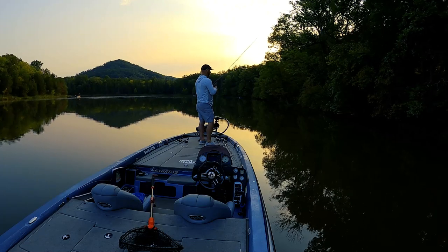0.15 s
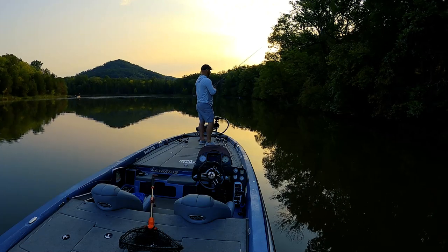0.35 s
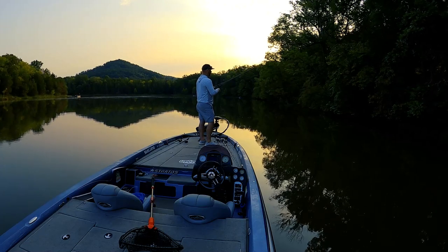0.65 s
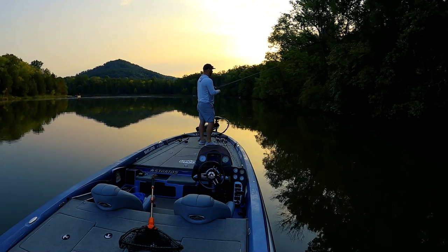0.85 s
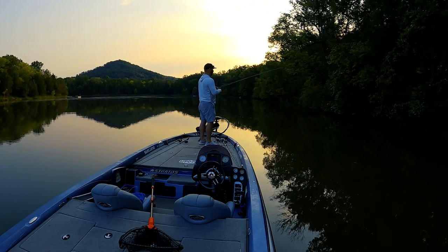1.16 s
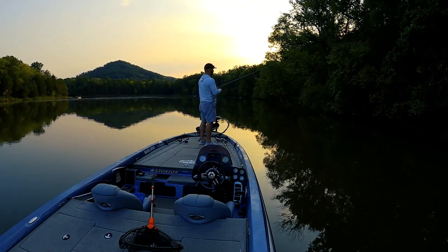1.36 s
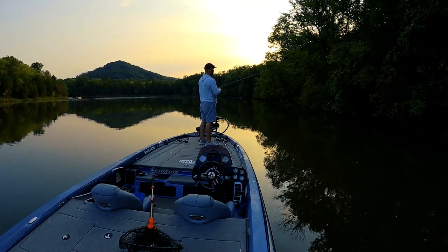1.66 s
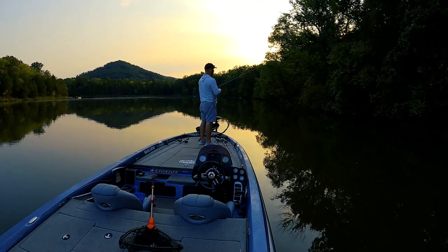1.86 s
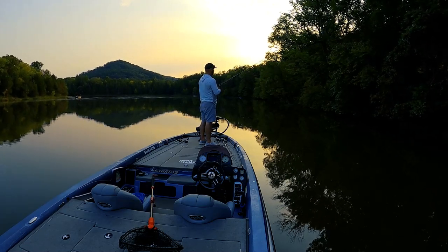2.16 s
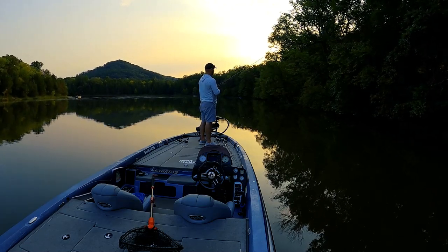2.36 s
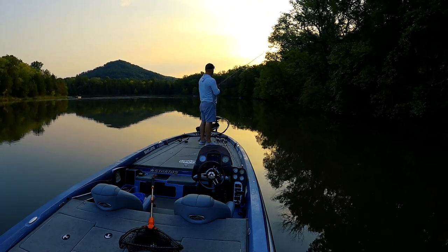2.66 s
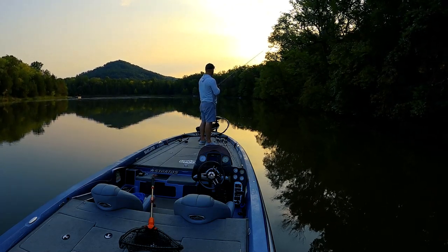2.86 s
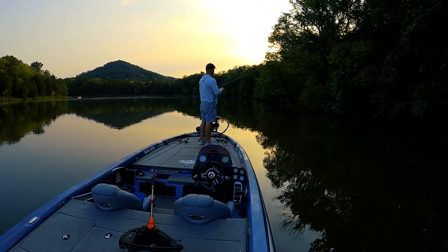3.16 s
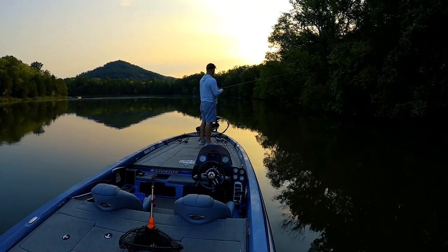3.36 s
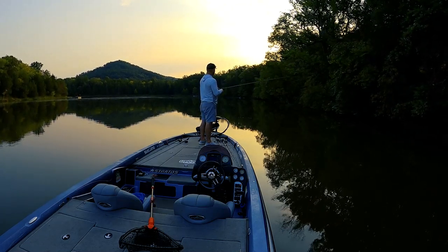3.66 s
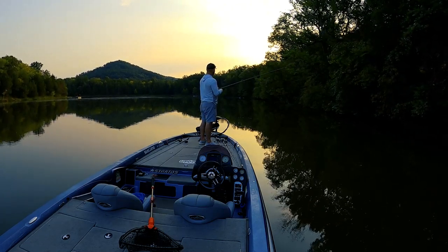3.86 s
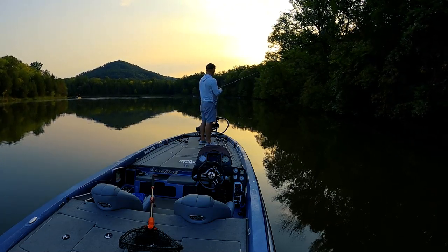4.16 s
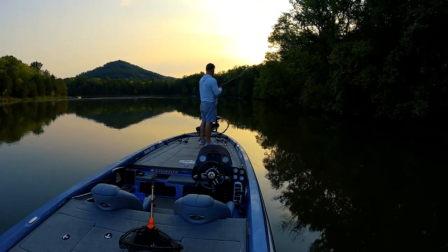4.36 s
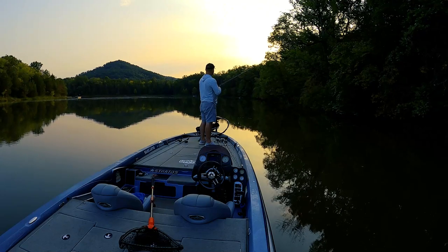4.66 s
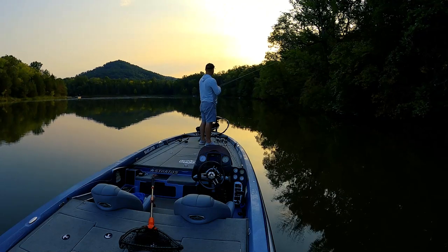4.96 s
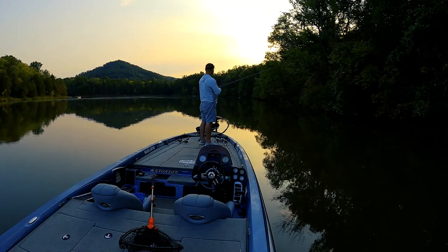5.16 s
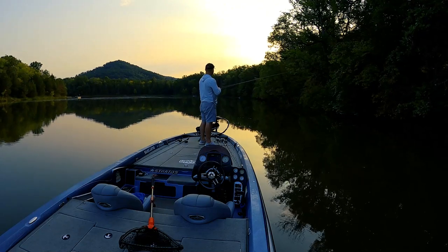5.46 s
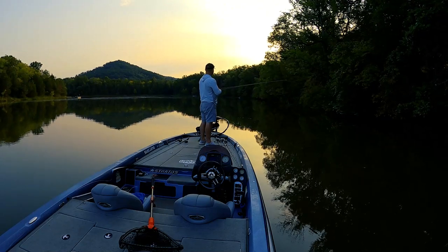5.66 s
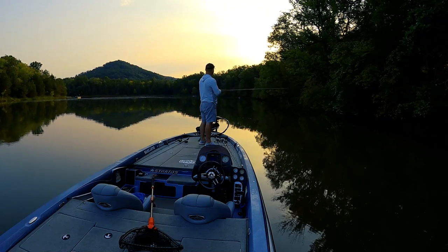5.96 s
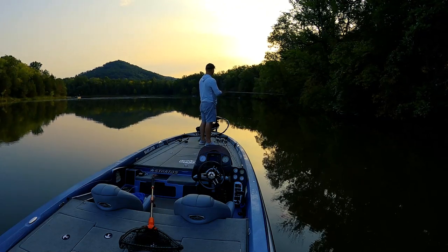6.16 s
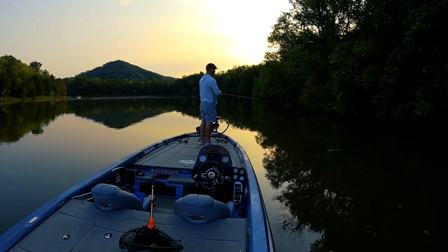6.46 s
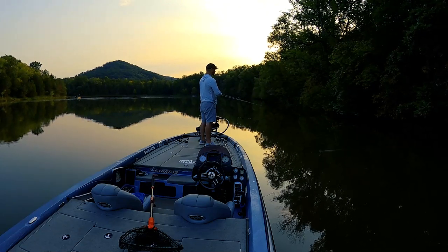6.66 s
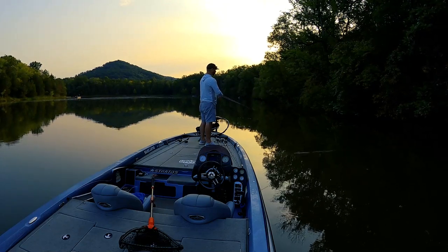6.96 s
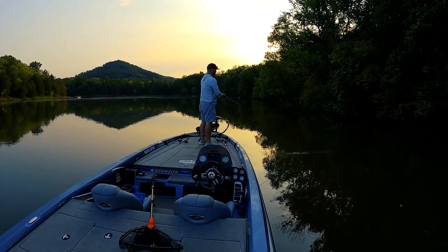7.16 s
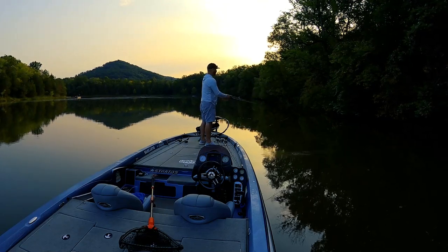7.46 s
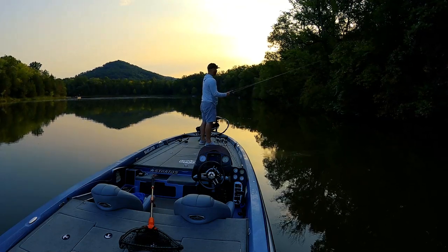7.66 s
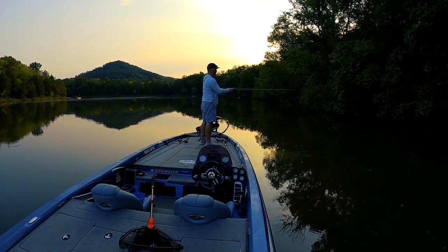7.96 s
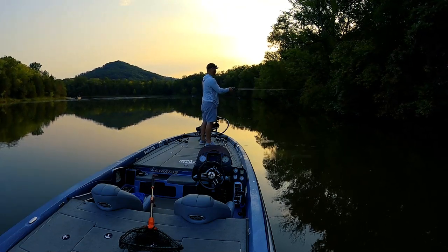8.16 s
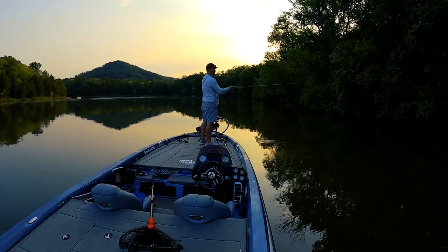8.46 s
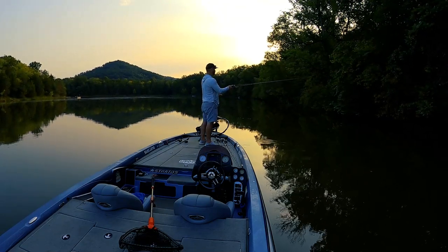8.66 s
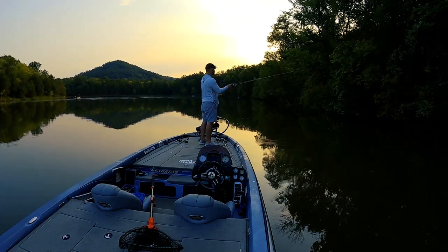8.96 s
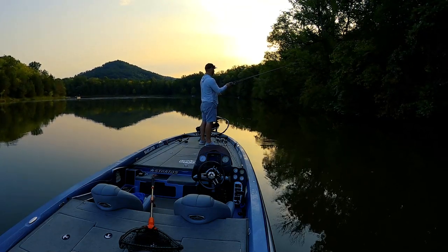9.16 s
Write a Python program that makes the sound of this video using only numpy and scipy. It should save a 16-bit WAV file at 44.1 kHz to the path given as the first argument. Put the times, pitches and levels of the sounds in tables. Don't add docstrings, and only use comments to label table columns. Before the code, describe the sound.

Dense steady insect drone over a still dusk lake, a close katydid buzzing in pulses, birds whistling, faint engine throb, then a fishing cast swishing.

```python
import sys
import numpy as np
from scipy import signal
from scipy.fft import rfft, irfft, next_fast_len
from scipy.io import wavfile
from scipy.ndimage import uniform_filter1d

SR = 44100
rng = np.random.default_rng(int(sys.argv[2]) if len(sys.argv) > 2 else 0)


def master_out(mix):
    frames = np.transpose(np.atleast_2d(mix))
    ceiling = np.clip(frames, -1, 1)
    pcm = np.round(ceiling * 32767).astype(np.int16)
    wavfile.write(sys.argv[1], SR, pcm)


def volts_from_db(level):
    exponent = np.asarray(level, float) / 20
    return 10 ** exponent


N = 410571

BANK_LAG, BOW_LAG = 3.34, 2.293
OPPOSITE = np.array([[1], [-1]])


def rms_one(x):
    return x / np.sqrt(np.mean(x ** 2) + 1e-20)


def in_time(rows):
    s, *columns = np.transpose(rows)
    return [np.interp(np.arange(N) / SR, s, c) for c in columns]


def in_span(rows, fade_s):
    s, *columns = np.transpose(rows)
    span = slice(int(s[0] * SR), min(int(s[-1] * SR), N))
    now = np.arange(span.start, span.stop) / SR
    fade = np.clip(np.minimum(now - s[0], s[-1] - now) / fade_s, 0, 1)
    return span, fade, [np.interp(now, s, c) for c in columns]


def drift(rate_hz):
    r = np.exp(-80 * np.pi * rate_hz / SR)
    white = rng.standard_normal(N // 40 + 2002)
    slow = signal.lfilter([1], [1, -2 * r, r * r], white)[2000:]
    return np.interp(np.arange(N) / 40, np.arange(len(slow)), rms_one(slow))


def hump(middle_s, length_s):
    out = np.zeros(N)
    start = max(int((middle_s - length_s / 2) * SR) + 1, 0)
    at = np.arange(start, min(int((middle_s + length_s / 2) * SR), N))
    out[at] = np.cos(np.pi * (at / SR - middle_s) / length_s)
    return out


def band(x, low_hz, high_hz):
    return signal.sosfilt(signal.butter(2, [low_hz, high_hz], "band", fs=SR, output="sos"), x)


def ring(clicks, hz, t60):
    r, w = volts_from_db(-60 / (t60 * SR)), 2 * np.pi * hz / SR
    return signal.lfilter([0, np.sin(w)], [1, -2 * r * np.cos(w), r * r], clicks + 1e-18)


def colour(x, points):
    size = next_fast_len(N)
    hz = np.maximum(np.fft.rfftfreq(size, 1 / SR), 1)
    point_hz, point_db = np.transpose(points)
    shape_db = np.interp(np.log(hz), np.log(point_hz), point_db, left=-90, right=-90)
    return irfft(rfft(x, size) * volts_from_db(shape_db) * np.sqrt(SR / 2), size)[..., :N]


def pan(x, left_right_db, lag=BANK_LAG):
    late = np.interp(np.arange(N) - lag, np.arange(N), x)
    return np.array([late * volts_from_db(left_right_db / 2), x * volts_from_db(-left_right_db / 2)])


def surround(sources, points):
    size, points = next_fast_len(N), np.array(points)
    hz = np.maximum(np.fft.rfftfreq(size, 1 / SR), 1)
    left_db, right_db, alike = (np.interp(np.log(hz), np.log(points[:, 0]), c) for c in points.T[1:])
    alike = np.clip(alike, 0, 1)
    common, own_left, own_right = rfft(sources, size)
    late = np.exp(-2j * np.pi * hz * BANK_LAG / SR)
    left = volts_from_db(left_db) * (np.sqrt(alike) * common * late + np.sqrt(1 - alike) * own_left)
    right = volts_from_db(right_db) * (np.sqrt(alike) * common + np.sqrt(1 - alike) * own_right)
    return irfft(np.array([left, right]) * np.sqrt(SR / 2), size)[:, :N]


def chorus():
    # pitch_hz, left_db_per_hz, right_db_per_hz, likeness_0_to_1
    insect_spectrum = [(3600, -130, -132, 0.2), (4050, -108, -111, 0.03), (4380, -97.5, -94.5, 0.43),
                       (4903, -86, -88.5, 0.08), (5120, -86.5, -86, 0.1), (5180, -82, -82.5, .1),
                       (5170, -85, -86, .15), (5655, -85.5, -86.5, 0.41), (6010, -88, -99, 0.53),
                       (6530, -92, -98, 0.26), (6968, -99, -106, 0.57), (7597, -107, -114, 0.7),
                       (8380, -121, -123, 0.13), (8700, -125, -128, 0.3), (9000, -175, -175, .3)]
    # time_s, level_db
    wood_swell = [(0, 0), (2.5, 1), (5, 1), (7, 1.1), (9.31, 1)]
    strokes = rng.standard_normal((3, N)) * (rng.random((3, N)) < .4)
    throb = np.array([volts_from_db(.5 * drift(15.0) + 0.34 * drift(22.0)) for _ in strokes])
    swell_db, = in_time(wood_swell)
    return volts_from_db(swell_db) * surround(rms_one(strokes * throb), insect_spectrum)


def katydid():
    # middle_s, level_db
    buzzes = [(.46, -85), (.76, -81), (1, -83), (1.27, -82.5), (1.53, -78), (1.8, -79), (2.07, -82),
              (2.36, -77.5), (2.64, -76), (2.94, -77.5), (3.21, -78.5), (3.48, -80), (3.779, -78.5),
              (4.07, -78.5), (4.33, -79), (4.61, -78), (4.89, -76.5), (5.17, -74), (5.46, -73), (5.72, -79),
              (5.98, -77.5), (6.31, -78), (6.57, -76.5), (6.92, -75.5), (7.19, -74.5), (7.45, -79.5),
              (8.21, -72), (8.6, -80.5), (9.03, -83.5)]
    buzz_s, wing_low_hz, wing_high_hz = 0.12, 7680, 7930
    swell = sum(volts_from_db(db - 3.0) * hump(s, buzz_s) for s, db in buzzes)
    teeth = rng.standard_normal(N) * (rng.random(N) < .1)
    wing = band(band(teeth, wing_low_hz, wing_high_hz), wing_low_hz, wing_high_hz)
    return pan(swell * rms_one(wing), 16.7)


def jay():
    # start_s, length_s, level_db, second_partial_db, its_change_in_first_syllable_db
    cries = [
        (0.967, 0.21, -60.5, -12.5, 1.5),
        (1.341, 0.2, -62, -10.5, -1.5),
        (3.598, 0.22, -68, -7, -9),
        (4.001, 0.2, -66.5, -12.5, -18),
        (7.205, 0.2, -72, 0, 0),
        (7.591, 0.2, -70.5, -2, -2),
    ]
    # share_of_cry, fourth_partial_hz, level_db, third_partial_db
    cry_course = [(0, 3230, -11, -24.5), (.1, 3255, -1.5, -28), (.24, 3250, -5.5, -19),
                  (.31, 3240, -18, -14), (.39, 3250, -16, -14), (.47, 3270, -4.5, -17),
                  (.68, 3220, -3.5, -8.5), (.9, 3140, -3.5, -6), (1, 3100, -11, -7)]
    flat_by_hz = [0, 0, 10, 35, 20, 20]
    nasal_by_db = [-8, 3, -4, 0, -2, -1]
    out, hoarse, waver = np.zeros(N), volts_from_db(2.8 * drift(32.0)), drift(43.5)
    for cry, flat_hz, nasal_db in zip(cries, flat_by_hz, nasal_by_db):
        s, length_s, cry_db, second_db, opening_db = cry
        rows = [(s + share * length_s, *rest) for share, *rest in cry_course]
        span, fade, (hz, level_db, third_db) = in_span(rows, 0.0022)
        phase = 2 * np.pi * np.cumsum(.25 * (hz - flat_hz) + 5.87 * waver[span]) / SR
        first_syllable = np.linspace(4, -6, len(hz)).clip(0, 1)
        voice = np.sin(4 * phase)
        voice += volts_from_db(second_db - .2 * level_db + opening_db * first_syllable) * np.sin(2 * phase)
        voice += volts_from_db(third_db + nasal_db + .6 * (second_db + 7)) * np.sin(3 * phase)
        voice += volts_from_db(-22) * np.sin(5 * phase)
        out[span] += fade * volts_from_db(cry_db + level_db + 1.0) * hoarse[span] * voice
    return out


def songbirds():
    # start_s, length_s, from_hz, to_hz, level_db
    slurs = [(0.66, 0.03, 4330, 4270, -70), (0.97, 0.037, 2800, 3050, -76), (.345, .035, 2850, 3450, -77),
             (.265, .055, 3150, 2850, -79), (1.147, 0.034, 3080, 2830, -71), (1.12, 0.037, 3190, 3120, -65),
             (7.39, 0.034, 3150, 3200, -71), (7.39, .03, 2900, 3400, -74), (8.99, 0.04, 3330, 3620, -73),
             (9.035, 0.014, 2943, 2500, -72), (9.093, 0.086, 1950, 3200, -76),
             (8.5, 0.0394, 3100, 3324, -78), (9.205, .03, 3150, 2750, -71), (5.405, .06, 3180, 3120, -77),
             (7.8, .07, 3230, 3200, -76)]
    # start_s, length_s, from_hz, to_hz, level_db
    right_slurs = [
        (.13, 0.019, 2770, 3230, -81.5),
        (0.151, 0.033, 3230, 3280, -74.5),
        (0.229, .11, 3370, 2730, -73.5),
        (0.338, 0.046, 2700, 2000, -77.5),
    ]
    # start_s, length_s, edge_hz, turn_hz, level_db
    arches = [
        (0.548, 0.097, 1900, 1480, -78.5),
        (0.929, 0.0502, 3300, 3740, -64),
        (.61, 0.0746, 510, 550, -72.5),
    ]
    # start_s, level_db
    falls = [
        (1.146, -75),
        (6.925, -77),
        (7.345, -69),
        (7.748, -64),
    ]
    # start_s, length_s, level_db
    hooks = [(0.434, 0.1, -76), (0.847, 0.09, -74), (1.259, 0.106, -75.5), (7.045, 0.065, -68.5),
             (7.452, 0.13, -70.5), (7.868, 0.1, -66)]
    # start_s, length_s, level_db
    rises = [
        (0.604, 0.068, -77),
        (1.017, .07, -64.5),
        (7.216, 0.056, -66.5),
        (7.618, .06, -65),
        (8.032, 0.062, -69),
    ]
    # start_s, chip_count, pitch_hz, level_db
    trills = [(.163, 4, 3750, -73), (.335, 1, 4000, -75), (.74, 1, 4300, -72), (.497, 4, 3700, -75),
              (.955, 1, 1400, -74), (1.525, 1, 2950, -62), (3.782, 1, 3050, -70), (3.835, 1, 3050, -72),
              (5.11, 2, 3700, -75), (8.005, 1, 4100, -69), (1.525, 1, 3600, -71), (1.556, 1, 4000, -73),
              (1.16, 2, 3600, -71), (.745, 1, 2300, -74)]
    # time_s, pitch_hz, level_db
    whistles = [
        [(.705, 4050, -76.5), (.725, 3696, -70), (.745, 3480, -73), (.772, 3320, -67), (.79, 3090, -72)],
        [(4.56, 3341, -78), (4.572, 3600, -66), (4.598, 3610, -73), (4.61, 2650, -72), (4.625, 2000, -75.5)],
        [(5.153, 3050, -68), (5.165, 3330, -65.5), (5.19, 3600, -66), (5.205, 3270, -73), (5.25, 3235, -72.5),
         (5.285, 3270, -69.5), (5.32, 2920, -70), (5.35, 2600, -79), (5.39, 2260, -80)],
        [(8.683, 4320, -69.5), (8.695, 3870, -68), (8.725, 3978, -74.5), (8.75, 3630, -70.5),
         (8.775, 3414, -80), (8.803, 3390, -67.5), (8.822, 2870, -79)],
    ]
    u = np.linspace(0, 1, 9)
    notes = []
    for s, d, a, b, db in slurs:
        notes.append((s, d, a + (b - a) * u, db + 7 * (u - .5), 19, False))
    for s, db in falls:
        notes.append((s, .035, 3500 + (4600 - 3500) * np.exp(-u * .035 / 0.012), db, 7, True))
    for s, d, db in rises:
        notes.append((s, d, 2783 - (2783 - 1200) * (1 - u) ** 2, db + 13 * (u - 1), 7, True))
    for s, d, a, b, db in right_slurs:
        notes.append((s, d, a + (b - a) * u, db, -8.5, False))
    for s, d, a, b, db in arches:
        notes.append((s, d, a + (b - a) * np.sin(np.pi * u), db, 8.5, False))
    for s, d, db in hooks:
        notes.append((s, d, 2610 + (2950 - 2610) * np.exp(-u * d / 0.014), db + 8 * (.5 - u), 5.5, False))
    for s, chip_count, hz, db in trills:
        for k in range(chip_count):
            notes.append((s + .026 * k, .016, hz + 220 - 480 * u, db, 9, False))
    paths = [(np.c_[s + u * d, hz, db + 0 * u], side_db, rasps) for s, d, hz, db, side_db, rasps in notes]
    paths += [(rows, 15, True) for rows in whistles]

    out, waver, burr = np.zeros((2, N)), drift(80.0), volts_from_db(2.5 * np.tanh(drift(55.0)))
    rasp = 1 + .7 * drift(150)
    for rows, side_db, rasps in paths:
        span, fade, (hz, level_db) = in_span(rows, 0.0026)
        phase = 2 * np.pi * np.cumsum(hz + 28 * waver[span]) / SR
        note = np.sin(phase) * volts_from_db(level_db + 5.5) * fade * burr[span]
        if rasps:
            note = note * rasp[span]
        out[:, span] += note * volts_from_db(OPPOSITE * side_db / 2)
    return out


def far_flock():
    # middle_s, length_s, level_db
    bouts = [(0.448, 1.6, -74), (1.18, 1.1, -66), (3.899, 2.32, -72), (4.602, 0.36, -79),
             (5.347, 0.554, -70.5), (7.32, 1.17, -67.5), (8.006, 1.4, -73), (9.1, 1.3, -73.5)]
    sweeps = [hz + 600 * np.tanh(drift(60.0)) for hz in (2700, 3100, 3400)]
    voices = [np.sin(2 * np.pi * np.cumsum(hz) / SR) * np.clip(drift(17.0) + .5, 0, 1.5) for hz in sweeps]
    return sum(volts_from_db(db) * hump(s, length_s) for s, length_s, db in bouts) * rms_one(sum(voices))


def banks(x, delay_s, t60):
    t = np.arange(SR) / SR
    build_up = np.clip((t - delay_s) / 0.044, 0, 1)
    scatter = rng.standard_normal((2, SR)) * volts_from_db(-60 * t / t60) * build_up
    scatter /= np.sqrt(np.sum(scatter ** 2, axis=1, keepdims=True))
    return signal.fftconvolve(scatter, x[None], axes=1)[:, :N]


def cast():
    # middle_s, length_s, line_db, sleeve_db, top_db
    strokes = [(4.966, 0.23, -96, -75.5, -88.5), (5.24, 0.61, -91.5, -90, -88.5),
               (6.49, 0.14, -86, -79.5, -84.5), (6.567, 0.26, -89.5, -70, -90),
               (6.732, 0.226, -95.5, -74, -92), (6.992, 0.198, -84, -75, -83.5),
               (7.759, 0.31, -74.5, -63.5, -82), (7.956, 0.24, -73.5, -58, -72),
               (8.12, 0.195, -85, -69.5, -79), (8.236, 0.13, -78, -80, -89),
               (9.176, 0.069, -84.5, -73, -82), (9.249, 0.19, -87.5, -66.5, -83)]
    # pitch_hz, level_db_per_hz
    line_hiss = [(5000, -25), (6500, -2), (8200, 1), (10000, -16), (11000, -38)]
    # pitch_hz, level_db_per_hz
    top_hiss = [(7500, -14), (9000, 3), (10300, -0.5), (12500, -7), (14000, -14), (15500, -27)]
    # pitch_hz, level_db_per_hz
    sleeve_rustle = [(250, 13.5), (450, 10.5), (1400, 11), (2000, 12), (2800, 9)]
    # pitch_hz, level_db_per_hz
    sleeve_swish = [(1500, -31), (2200, 3.5), (3400, 10), (4500, 9), (6000, -30)]
    gains = np.zeros((4, N))
    for s, length_s, line_db, sleeve_db, top_db in strokes:
        stroke = hump(s, length_s)
        moving = np.flatnonzero(stroke)
        speed = stroke[moving]
        gains[0, moving] += volts_from_db(line_db) * speed
        gains[1, moving] += volts_from_db(top_db) * speed ** 2.4
        gains[2, moving] += volts_from_db(sleeve_db - 3.5) * speed ** 1.86
        gains[3, moving] += volts_from_db(sleeve_db) * speed ** 1.86
    white = rng.standard_normal((2, 2, N))
    # spectrum, band that sets its level (Hz, Hz), trim dB, left minus right dB
    layers = [(line_hiss, 8200, 10000, 1.5, -9), (top_hiss, 10500, 14000, 1.5, -6),
              (sleeve_rustle, 400, 1400, -.5, 1.5), (sleeve_swish, 3450, 4200, -1.5, 3)]
    out = np.zeros((2, N))
    for k, (spectrum, low_hz, high_hz, trim_db, side_db) in enumerate(layers):
        near, stray = colour(white[k % 2], spectrum)
        clumps = volts_from_db(trim_db + 2.6 * drift(40.0))
        gain = gains[k] * clumps / band(near, low_hz, high_hz).std()
        out += pan(gain * near, side_db, BOW_LAG) + 0.5 * gain * stray * OPPOSITE
    return out


def rod_tip():
    # middle_s, length_s, full_speed_hz, level_db, loss_through_whip_db
    whips = [
        (7.762, 0.235, 11600, -61, 2),
        (7.98, 0.2, 12300, -59, 10),
        (7.775, .22, 8800, -65, 0),
        (7.97, .16, 9600, -66, 5),
        (8.235, .1, 8500, -76, 0),
        (8.125, .07, 8900, -74, 0),
    ]
    rest_hz, width_hz = 6500, 1000
    out, white = np.zeros((2, N)), rng.standard_normal(N + SR)
    wide = rms_one(band(band(white, 20, width_hz), 20, width_hz))
    for k, (s, length_s, full_hz, db, loss_db) in enumerate(whips):
        speed = hump(s, length_s)
        at = np.flatnonzero(speed)
        hz = rest_hz + (full_hz - rest_hz) * speed[at] ** 1.3
        tilt_db = -10 * np.log2(hz / rest_hz)
        level_db = db + tilt_db - loss_db * (at / SR - s) / length_s
        onset = np.clip(speed[at] / 0.254, 0, 1)
        flutter = wide[at + k * SR // 5 - [[0], [SR]]]
        out[:, at] += volts_from_db(level_db) * onset * flutter * np.sin(2 * np.pi * np.cumsum(hz) / SR)
    off_water = .45 * out[1] * OPPOSITE
    return volts_from_db(1.5) * (pan(out[0], -8.0, BOW_LAG) + off_water)


def reel():
    # start_s, bright_tick_peak_db, body_db, left_minus_right_db
    clicks = [
        (4.799, -76.5, -63.5, -0.5),
        (6.5104, -69, -77.5, -5.0),
        (7, -63, -80, -1),
        (7.4881, -70, -44.5, -4),
        (7.557, -52, -66, -7),
        (9.1668, -48.5, -87.5, -7.5),
        (9.214, -64.5, -58, -7),
        (9.2319, -52.5, -63, -8.5),
    ]
    # start_s, peak_db
    guide_ticks = [(6.4697, -64.5), (6.5444, -67), (6.6244, -68.5), (6.7206, -69), (6.7643, -70),
                   (6.9094, -63.5), (6.9392, -70), (6.9594, -65), (7.0494, -66.5)]
    # pitch_hz, level_db, t60_s
    reel_modes = [(1680, 10.5, 0.0045), (2000, -0.5, 0.004), (2950, 0.5, 0.0051), (4080, 8, 0.0033),
                  (5340, 11, 0.0042), (6540, -14, 0.0053)]
    out, t = np.zeros((2, N)), np.arange(1200) / SR
    for s, tick_db, body_db, side_db in clicks + [(s, db + 4.5, -99, -7) for s, db in guide_ticks]:
        snap = band(rng.standard_normal(1200) * volts_from_db(-60 * t / 0.011), 6000, 11200)
        rattle = 0.37 * rng.standard_normal(1200) * volts_from_db(-60 * t / 0.039) * (rng.random(1200) < .1)
        rattle[round(.0008 * SR)] = 1
        body = sum(volts_from_db(db) * ring(rattle, hz, t60) for hz, db, t60 in reel_modes)
        click = volts_from_db(tick_db - 6) * snap + volts_from_db(body_db + 1.0) * band(body, 1770, 8100)
        at = round((s + 0.001166) * SR)
        out[:, at:at + 1200] += click * volts_from_db(OPPOSITE * side_db / 2)
    return out


def taps():
    # start_s, peak_db, pitch_hz, t60_s
    handle_taps = [(6.487, -50, 2800, .012), (6.511, -47, 3180, .012), (6.535, -51, 3400, .012),
                   (6.548, -47, 3050, .015), (6.5944, -44, 3500, .015), (6.5944, -46, 2520, 0.017),
                   (6.6707, -48, 1290, .03), (6.7046, -47, 2070, 0.041), (6.7046, -58, 2500, .01),
                   (6.746, -54, 3200, .01), (6.784, -52, 2700, .008), (6.846, -57, 2400, .01),
                   (6.945, -55, 2300, .015), (7.0074, -43, 3150, 0.0096), (7.9884, -40, 3200, .012),
                   (7.96, -52, 1700, .03), (7.985, -46, 2250, .03), (9.214, -42, 1350, .012),
                   (9.216, -50, 905, 0.017)]
    out = np.zeros(N + 3000)
    for s, db, hz, t60 in handle_taps:
        at = round(s * SR)
        out[at:at + 3000] += ring(np.r_[volts_from_db(db - 4.5), np.zeros(2999)], hz, t60)
    return pan(out[:N], -2, BOW_LAG)


def knock():
    # start_s, thud_db, hollow_db
    footsteps = [
        (3.66, -68, -72),
        (4.8, -45, -73),
        (9.297, -45, -54),
    ]
    # pitch_hz, t60_s
    deck_modes = [
        (115, 0.084),
        (530, 0.12),
    ]
    steps = np.zeros((2, N))
    steps[:, [round(row[0] * SR) for row in footsteps]] = volts_from_db(np.array(footsteps)[:, 1:].T)
    return sum(ring(step, hz, t60) for step, (hz, t60) in zip(steps, deck_modes))


def hull():
    # start_s, peak_db, pitch_hz
    thumps = [(2.936, -57, 64), (3.164, -53, 88), (3.222, -52, 83.4), (3.339, -51, 80), (3.454, -51.5, 80),
              (3.894, -49, 61.9), (4.079, -49, 83.1), (4.637, -59, 108), (4.637, -51, 64.6),
              (4.772, -50, 86.1), (4.911, -49.5, 108), (5.013, -54, 108), (5.416, -48, 61.9),
              (5.686, -55, 83.4), (5.985, -52, 87.4), (6.158, -65, 88.8), (6.47, -55, 83.4),
              (6.726, -61, 108), (6.731, -55, 96.9), (6.851, -56, 109), (7.12, -54, 101),
              (7.246, -54, 91.5), (7.532, -55, 94), (7.712, -51, 75.4), (7.949, -56, 94.2),
              (8.174, -53, 88.8), (8.426, -65, 82), (8.582, -47, 86.1), (8.911, -61, 96),
              (9.057, -56, 88.8)]
    # middle_s, length_s, pitch_hz, level_db
    booms = [(3.35, 0.092, 184, -54), (3.8, 0.1, 192, -52.5), (4.87, 0.068, 180, -50),
             (5.34, 0.096, 189, -48), (6.08, .14, 191, -48.5), (6.3, 0.072, 166, -48),
             (6.44, 0.12, 165.6, -50.5), (6.871, 0.093, 195, -44.5), (7.0, 0.19, 197.4, -52),
             (7.17, .08, 173, -48.5), (7.85, 0.11, 179.7, -53.5), (1.5, .14, 200.2, -48),
             (3.22, 0.13, 204, -52.5), (3.47, 0.088, 200, -55), (5.47, .12, 200, -51.5),
             (7.35, .12, 200, -54), (2.2, 0.13, 140, -49)]
    out, t = np.zeros(N), np.arange(N) / SR
    lumps = [(s + 0.0297, 0.095, hz, db - 3) for s, db, hz in thumps] + booms
    for s, length_s, hz, db in lumps:
        at = slice(max(int((s - length_s) * SR), 0), int((s + length_s) * SR))
        out[at] += volts_from_db(db) * hump(s, length_s)[at] ** 2 * np.sin(2 * np.pi * hz * (t[at] - s))
    return pan(out, .7) + .1 * np.roll(out, round(0.0038 * SR)) * OPPOSITE


def throbbing(hz, steady, rate_hz):
    phase = 2 * np.pi * np.cumsum(hz) / SR
    return rms_one((steady + drift(rate_hz)) * np.sin(phase) + drift(rate_hz) * np.cos(phase))


def engine():
    # time_s, level_db
    load_course = [(0.0, -71.5), (0.07, -53.5), (0.47, -58), (0.52, -61), (1.09, -55), (1.11, -63.5),
                   (1.3, -49.5), (2.38, -57), (3.86, -52), (4.51, -62.5), (4.61, -54.5), (6.79, -56.5),
                   (6.84, -52.5), (7.45, -60), (7.62, -60.5), (8.22, -65), (8.92, -60), (9.31, -64)]
    # time_s, pitch_hz
    firing_pitch = [(0, 74.3), (1.5, 76.1), (3.5, 77.27), (5.5, 85.76), (9.31, 86.1)]
    # middle_s, level_db
    firing_swells = [(.14, -58), (.27, -44), (.41, -42.5), (.6, -57), (.75, -51), (.92, -56), (1.07, -54),
                     (1.33, -54), (1.49, -60), (1.65, -50), (1.758, -57), (2.09, -59), (2.45, -70),
                     (2.6, -54.5), (2.74, -62), (1.88, -58), (2.22, -49), (2.87, -48), (3.25, -52.5),
                     (4.69, -57), (7.52, -83), (8.69, -58)]
    # time_s, level_db
    second_course = [(0, -69), (1.3, -60), (3.3, -62), (3.6, -58), (4.4, -61), (4.6, -55.5), (5.5, -54),
                     (5.65, -60), (7.35, -61.5), (7.5, -71), (8.5, -71), (8.7, -57.5), (9.31, -59.5)]
    # middle_s, length_s, level_db
    rev_bursts = [(0.343, 0.16, -52.5), (0.886, 0.25, -48.5), (1.115, 0.29, -54.5), (1.422, 0.278, -45),
                  (1.755, 0.4, -51), (2.046, 0.31, -53), (7.72, 0.24, -73), (2.893, 0.87, -63),
                  (3.66, 0.27, -52), (4.066, 0.21, -53.5)]
    t, load = np.arange(N) / SR, volts_from_db(in_time(load_course)[0])

    firing = volts_from_db(-43 - 12.5 * t)
    firing += volts_from_db(-69.5 + 4 * np.sin(2 * np.pi * 5.9 * t + 3 * np.sin(1.675 * t)))
    firing += sum(volts_from_db(db) * hump(s, 0.12) ** 2 for s, db in firing_swells)
    tone = firing * throbbing(in_time(firing_pitch)[0], steady=2.06, rate_hz=10.2)
    growl_noise = band(band(rng.standard_normal(N), 88.7, 124.8), 88.7, 124.8)
    growl = volts_from_db(-11.5) * firing * rms_one(growl_noise)

    second = volts_from_db(in_time(second_course)[0]) * throbbing(np.full(N, 143.8), steady=2.13, rate_hz=5.9)
    third_entry = np.clip((t - 4.13) / 0.28, 0, 1)
    third = volts_from_db(-71.5) * third_entry * throbbing(np.full(N, 233.44), steady=1.4, rate_hz=1.5)

    white = rng.standard_normal((2, 2, N)) * [[1], [.25]]
    low = band(band(white[0], 144.2, 208.0), 142.0, 238.0)
    top = band(band(white[1], 208.0, 278.0), 213.0, 319)
    surge = volts_from_db(-59.5) * hump(7.66, 0.25)
    low_gain = load * volts_from_db(-2 + 1.82 * drift(1.0)) + surge
    revs = sum(volts_from_db(db - 8) * hump(s, length_s) for s, length_s, db in rev_bursts)
    top_gain = load * volts_from_db(-24.5) + revs
    mid, side = low_gain * low / low[0].std() + top_gain * top / top[0].std()
    return pan(tone + growl + second + third + mid, 1.0) + side * OPPOSITE


def air():
    # pitch_hz, left_db_per_hz, right_db_per_hz, likeness_0_to_1
    air_spectrum = [(27.2, -101, -100, 0.7), (46, -85.5, -84.5, 0.85), (85, -85.5, -86, 0.85),
                    (120, -83.5, -86, 0.9), (323, -95, -92, 0.35), (648, -105, -102, 0.22),
                    (835, -106, -104, 0.26), (1252, -99, -100, 0.33), (2330, -104, -110, 0.4),
                    (3600, -100, -108, 0), (4030, -105, -110, 0.8), (8300, -122, -122, 0.4),
                    (10084, -121, -118, 0.7), (10690, -125.5, -125.5, 0), (13700, -125, -123.5, 0.1),
                    (12760, -175, -175, .2)]
    return surround(rng.standard_normal((3, N)) * volts_from_db(.6 * drift(2.5)), air_spectrum)


def scene():
    cries, notes = jay(), songbirds()
    song = notes.mean(axis=0)
    echoes = volts_from_db(5.0) * banks(band(cries, 2300, 6100), 0.053, 0.41)
    echoes += volts_from_db(-3.5) * banks(song, 0.0051, 0.8)
    echoes += volts_from_db(-6) * banks(song, 0, .08) * volts_from_db([[2], [-4]])
    flock = banks(far_flock(), .001, 0.23) * volts_from_db([[3], [-3.5]])
    birds = pan(cries, 22.8) + notes + echoes + flock
    angler = cast() + rod_tip() + reel() + taps() + knock()
    return chorus() + katydid() + birds + angler + hull() + engine() + air()


def low_pass(x):
    return signal.sosfilt(signal.butter(12, 15900, fs=SR, output="sos"), x)


def record(dry):
    # low_hz, high_hz, dropped_under_db
    treble_bands = [
        (12850, 13700, -98.5),
        (13700, 14700, -94.5),
        (14700, 15900, -96),
    ]
    size = next_fast_len(N)
    spectrum, hz, out = rfft(dry, size), np.fft.rfftfreq(size, 1 / SR), dry.copy()
    for low_hz, high_hz, gate_db in treble_bands:
        top = irfft(spectrum * ((hz >= low_hz) & (hz < high_hz)), size)[:, :N]
        faint = uniform_filter1d(np.mean(top ** 2, axis=0), size=1024) < volts_from_db(2 * gate_db)
        out -= top * uniform_filter1d(faint * 1.0, size=512)
    return low_pass(out)


dry = scene()
out = record(dry)
master_out(out)
```